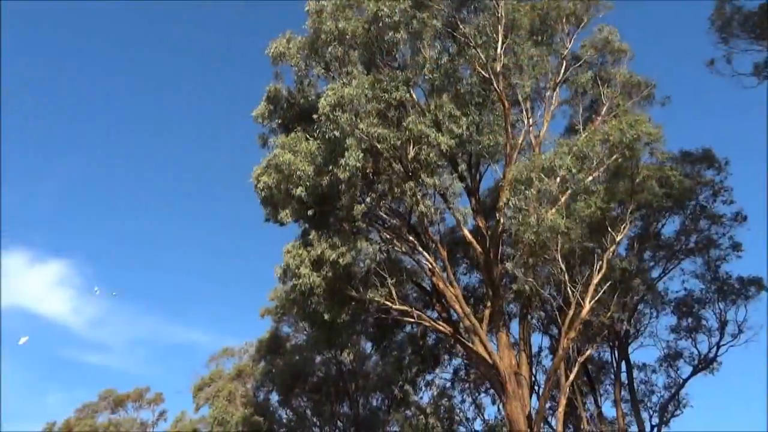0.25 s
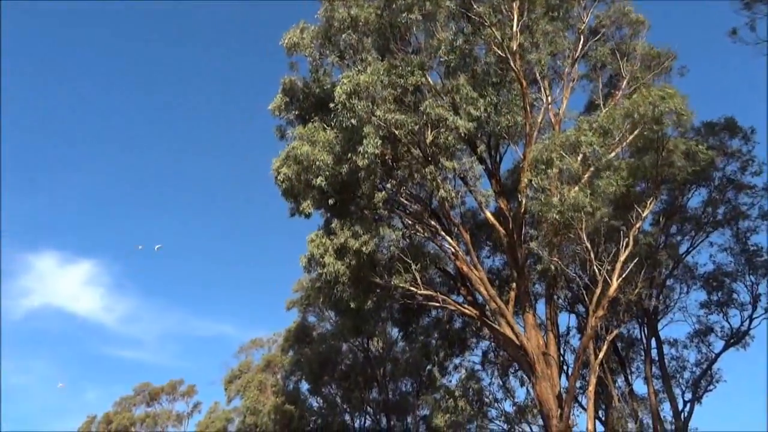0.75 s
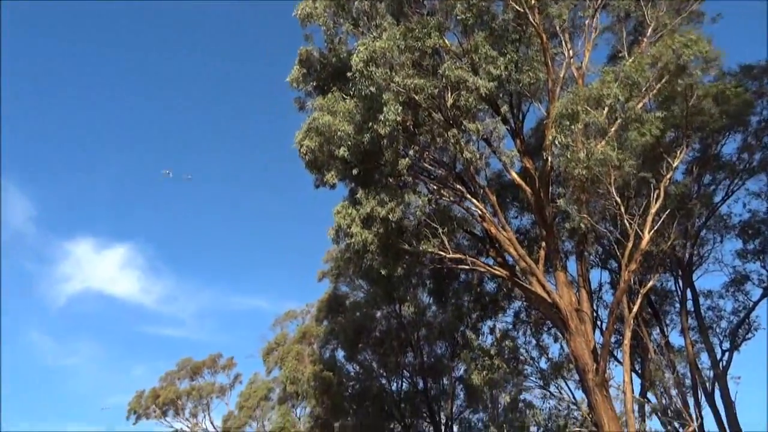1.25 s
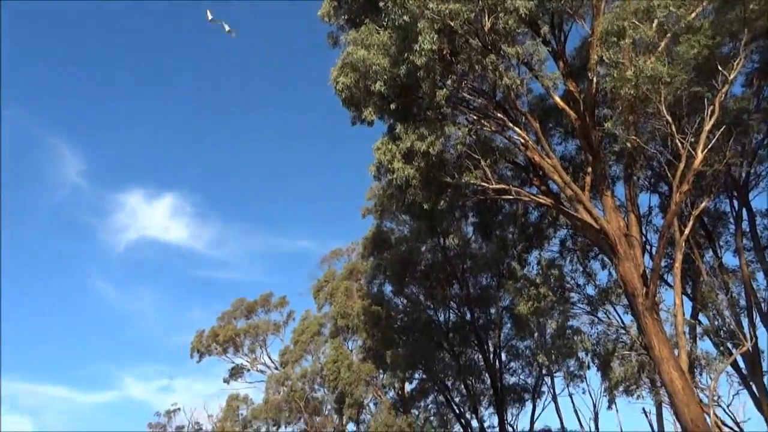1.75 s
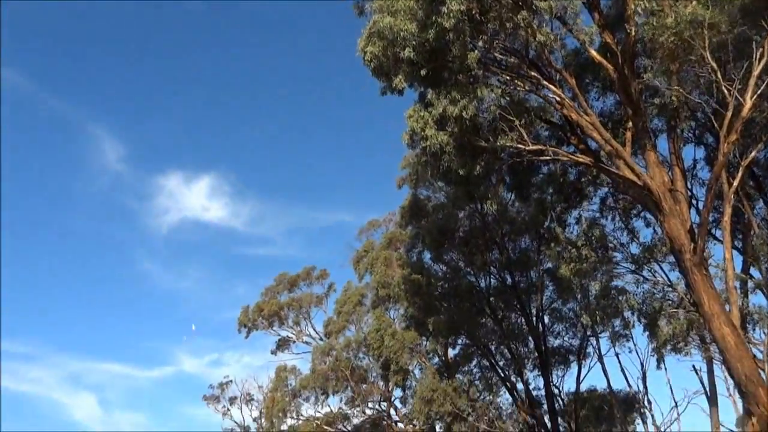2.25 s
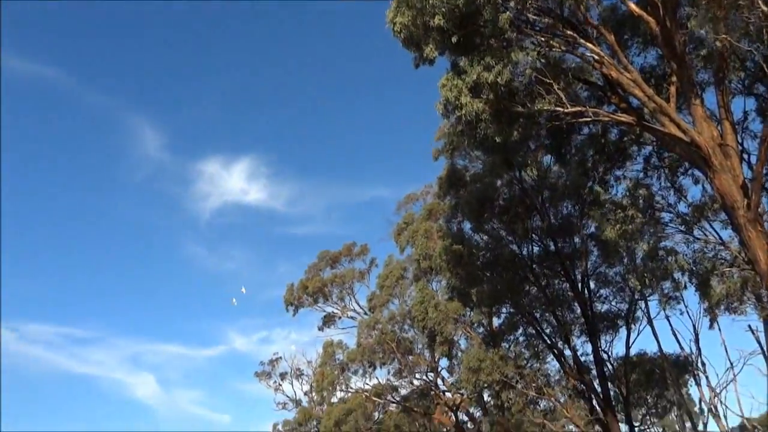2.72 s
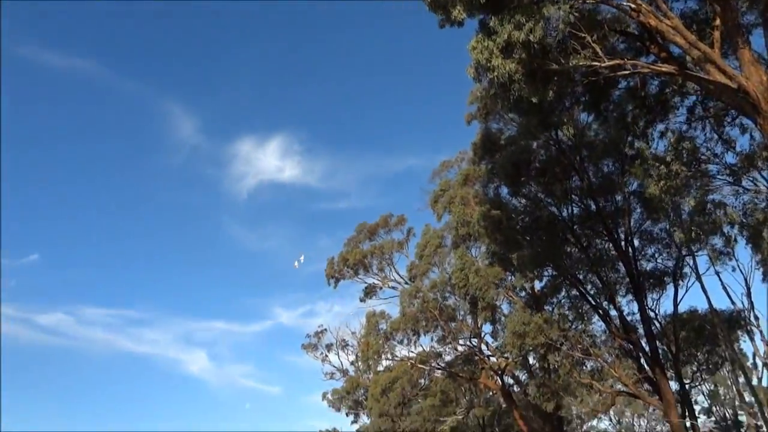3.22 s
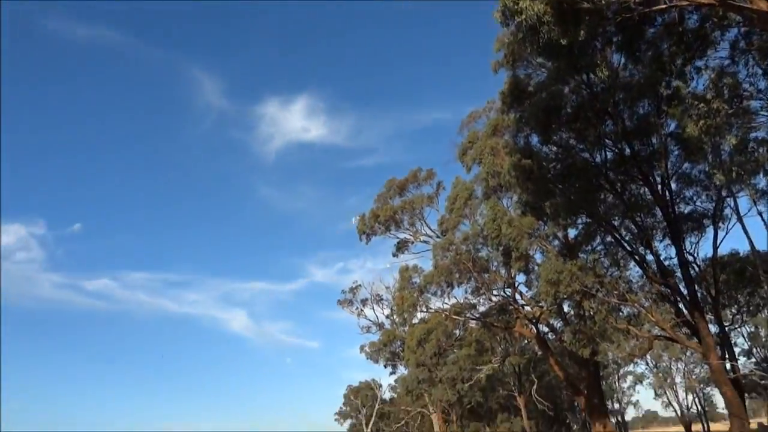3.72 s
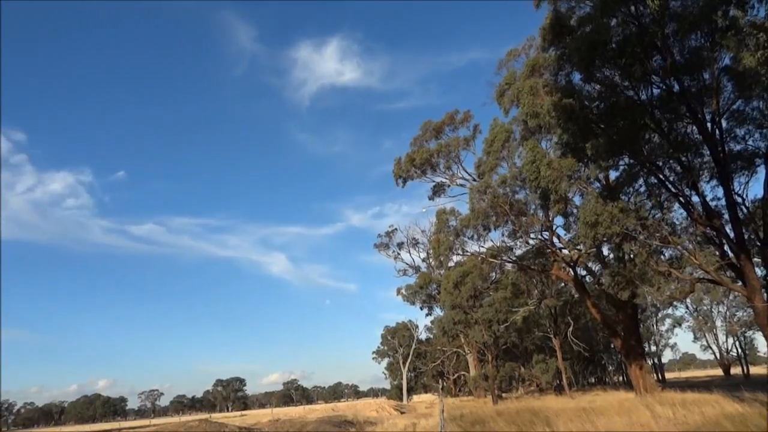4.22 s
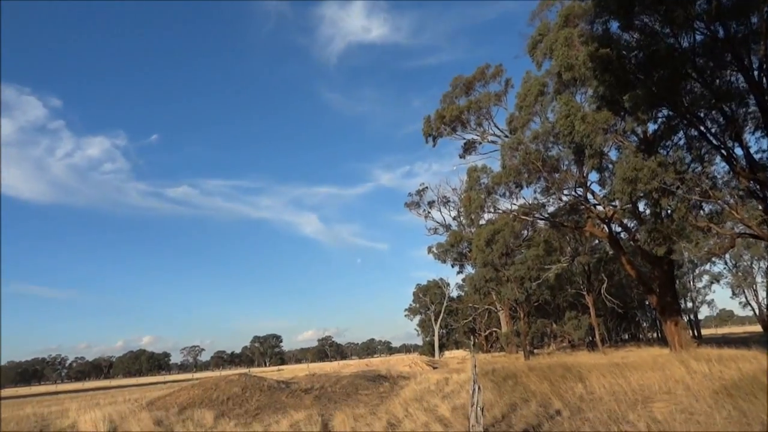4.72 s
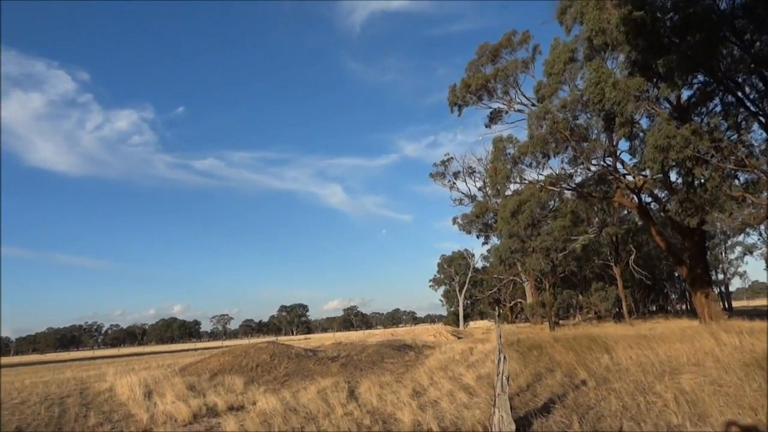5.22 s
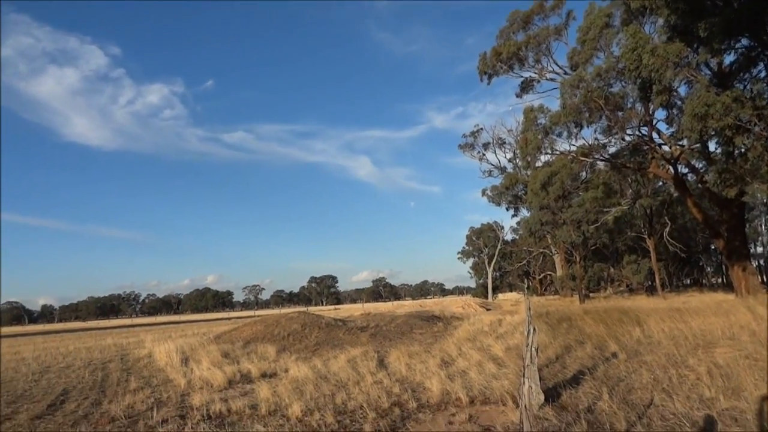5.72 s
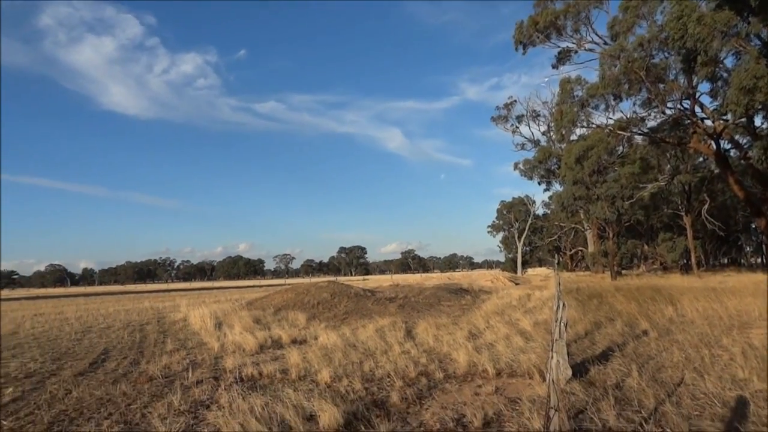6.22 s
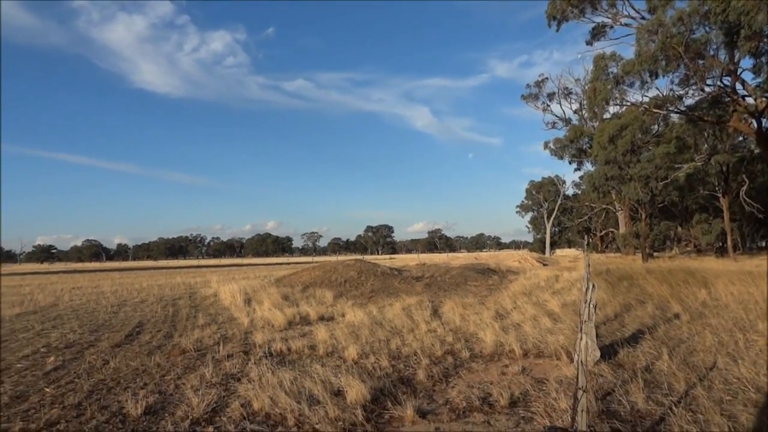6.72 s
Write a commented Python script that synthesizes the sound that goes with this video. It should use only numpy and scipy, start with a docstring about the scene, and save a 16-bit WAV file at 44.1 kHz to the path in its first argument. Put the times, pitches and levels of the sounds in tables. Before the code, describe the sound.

Wind thumps a camera microphone as near parrots give wavering, raspy yelps, with a far screeching flock and thin small-bird whistles behind.

```python
"""Open bushland in gusty wind, with a flock of cockatoos overhead.
Near birds give short wavering yelps, overtones of a bending pitch shaped by the throat, and one a long
hoarse screech of rattling noise. The far flock is a harsh chorus of broken yelps, chirps and hiss; small
birds whistle above it in thin sines, and the trees answer the near and small birds with a tail and an echo.
The wind is lumpy low noise that buffets the two ports of a camera microphone."""
import sys
import numpy as np
from scipy import signal
from scipy.fft import rfft, irfft, next_fast_len
from scipy.io import wavfile
from scipy.ndimage import uniform_filter1d, map_coordinates

SR = 44100
rng = np.random.default_rng(int(sys.argv[2]) if len(sys.argv) > 2 else 0)


def generate_wav(signal):
    """Clip the signal to [-1, 1] and save it as 16-bit WAV at the path in sys.argv[1]."""
    frames = np.transpose(np.atleast_2d(signal))
    scaled = np.clip(frames, -1, 1) * 32767
    pcm = np.round(scaled).astype(np.int16)
    wavfile.write(sys.argv[1], SR, pcm)


N = 306936  # length in samples
TOP_HZ = 15700  # band limit of the camera

# The far chorus as it swells and thins; its first row also starts the faint hiss.
# Each row: time in seconds, level of the low, middle and treble band in dB.
FAR_CHORUS = [(0.19, -31, -46, -53), (0.3, -26, -30, -38), (0.59, -26, -30.5, -40), (0.78, -22.5, -20, -27),
              (0.88, -27.5, -26.5, -36), (1.19, -17, -21, -31.5), (1.33, -20.5, -26, -36.5),
              (1.9, -23, -24, -28), (2.05, -27.5, -27, -32), (2.58, -30, -26.5, -34.5),
              (2.71, -23, -26.5, -33), (2.9, -27, -27, -33), (3.11, -29.5, -32, -42), (3.3, -29, -28, -40),
              (3.5, -32, -32.5, -38.5), (4.19, -29, -34, -49.5), (4.3, -31.5, -30, -41.5),
              (4.56, -32, -31, -49), (4.7, -37, -33.5, -43.5), (5.09, -31.5, -37.5, -52),
              (5.41, -28.5, -33.5, -52.5), (5.71, -34.5, -33.5, -47.5), (5.93, -41, -37, -52.5),
              (6.22, -31, -31, -47), (6.41, -31, -36, -51), (6.52, -26.5, -28.5, -44),
              (6.95, -29, -31.5, -44)]


def amp(db):
    """Decibels to an amplitude factor."""
    return 10 ** (np.asarray(db) / 20)


def unit(x):
    """x scaled to rms 1."""
    return x / np.sqrt(np.mean(x ** 2) + 1e-20)


def along(points, hz):
    """(Hz, value) points read off on a log frequency axis."""
    f, v = np.transpose(points)
    return np.interp(np.log(hz + 1), np.log(f + 1), v)


def curves(rows, round_s=0.0046):
    """One value per sample for each column after the time, corners rounded."""
    s, *cols = np.transpose(rows)
    t = np.arange(N) / SR
    return [uniform_filter1d(np.interp(t, s, c), int(round_s * SR) + 1) for c in cols]


def wobble(rate, size=N):
    """A smooth random curve, rate knots a second."""
    knots = rng.standard_normal(int(size * rate / SR) + 4)
    return map_coordinates(knots, [np.arange(size) * rate / SR])


def filtered(x, response):
    """x times a response of frequency."""
    m = next_fast_len(N + SR // 2)
    return irfft(rfft(x, m) * response(np.fft.rfftfreq(m, 1 / SR)), m)[..., :N]


def coloured(x, spectrum):
    """x through a (Hz, dB) spectrum, at rms 1."""
    return unit(filtered(x, lambda hz: amp(along(spectrum, hz))))


def syrinx(pitch_hz, weight, count):
    """Overtones of a moving pitch; weight(k) is the strength of overtone k."""
    turn = 2 * np.pi * np.cumsum(pitch_hz) / SR
    return sum(weight(k) * np.sin(k * turn) for k in range(1, count + 1))


def note(rows, fade_s, glide_s):
    """First sample, smooth pitch and gain of one call, with soft ends, from rows of (s, Hz, dB)."""
    s, hz, db = np.transpose(rows)
    t = np.arange(round((s[0] - fade_s) * SR), round((s[-1] + fade_s) * SR)) / SR
    ends = np.clip(np.minimum(t - t[0], t[-1] - t) / fade_s, 0, 1) ** 2
    pitch = uniform_filter1d(np.interp(t, s, hz), int(glide_s * SR))
    return round(t[0] * SR), pitch, ends * amp(np.interp(t, s, db))


def yelps():
    """Pulses through the throat; the low, pressed, loud part of a call is brighter; hoarse birds jitter and rattle."""
    # Near cockatoos. Each row: start, dip, crest and end in seconds (a crest may fall outside its call),
    # first peak, dip, crest and end pitch in Hz, first and second level in dB, hoarseness 0-1,
    # brightness in dB per overtone above the fourth.
    near_calls = [ (0.263, .304, .358, .384, 947, 704, 887, 740, -12.5, -14.5, 0.2, -3),
                  (0.429, 0.457, .479, .498, 717, 700, 730, 665, -20.5, -20.5, 0.11, 0),
                  (.5, 0.513, .548, .588, 752, 747, 781, 683, -17, -17, 0.13, -2.5),
                  (.59, 0.598, .62, .645, 735, 760, 794, 775, -22, -17, .06, -6),
                  (0.937, 0.965, .996, 1.016, 716, 729, 956, 890, -20, -19, 0.03, -8),
                  (1.005, 1.025, 1.05, 1.068, 815, 800, 812, 820, -19, -17.5, .03, -9),
                  (1.125, 1.14, 1.23, 1.212, 800, 850, 880, 730, -18, -18, .6, -2),
                  (1.2, 1.216, 1.243, 1.262, 745, 750, 828, 790, -16, -15.5, .07, -5),
                  (2.182, 2.201, 2.2, 2.25, 669, 660, 686, 675, -28, -32, .05, -13),
                  (2.471, 2.512, 2.542, 2.577, 778, 648, 805, 733, -19, -18, 0.08, -11),
                  (2.666, 2.708, 2.742, 2.756, 814, 674, 770, 738, -25, -24, 0.4, -1.5),
                  (2.787, 2.812, 2.838, 2.866, 962, 904, 1005, 950, -18, -22.5, 0.22, -2),
                  (2.937, 2.968, 3.006, 3.053, 799, 710, 828, 770, -10.5, -11, 0.09, 0.3),
                  (3.157, 3.191, 3.226, 3.247, 749, 652, 753, 740, -15.5, -15, 0.09, 0.05),
                  (3.27, 3.297, 3.3, 3.328, 825, 802, 900, 835, -12, -16.5, .06, .2),
                  (3.417, 3.444, 3.455, 3.468, 790, 785, 883, 785, -12.5, -16, .04, .3),
                  (4.3, 4.333, 4.37, 4.415, 770, 687, 813, 754, -13, -12, 0.05, 0.2),
                  (4.523, 4.563, 4.602, 4.613, 746, 627, 764, 730, -16.5, -16, 0, -1.5),
                  (5.148, 5.222, 4.7, 5.246, 775, 720, 753, 742, -30, -25, 0.33, -0.5),
                  (6.101, 6.14, 6.3, 6.191, 760, 728, 750, 750, -41, -26.5, 0.3, -1),
                  (6.226, 6.264, 6.312, 6.338, 796, 689, 805, 747, -16.5, -13, 0.06, 0.14),
                  (6.451, 6.483, 6.6, 6.556, 717, 635, 780, 781, -25, -23, .3, -1.2), ]
    # Throat resonances. Each row: frequency in Hz, overtone level in dB.
    throat = [(700, -22.5), (1500, -3), (2450, 1), (3350, -5), (4400, -12.5), (5700, -12), (7600, -21.5),
              (9800, -42), (12500, -45), (15000, -49), (16500, -58)]
    # Air hissing past the folds. Each row: frequency in Hz, relative level in dB per Hz.
    breath = [(900, -36), (1500, -5), (2800, -5), (5000, -6), (8000, -16), (10000, -25), (12000, -19),
              (15500, -30)]
    breath_db = -20.5  # under the voice
    pressed_s, relax_db = 0.019, -0.55  # after the dip the voice relaxes and loses treble, per overtone

    out = np.zeros(N)
    air = amp(breath_db) * coloured(rng.standard_normal(N), breath)
    for *shape, hoarse, bright_db in near_calls:
        start, pitch, gain = note(yelp_shape(*shape), fade_s=.008, glide_s=0.0036)
        n, hoarse = len(pitch), np.clip(hoarse, 0, 1)
        since_dip = (start + np.arange(n)) / SR - shape[1]
        relaxed = np.clip((since_dip - pressed_s) / .006, 0, 1)
        effort_db = 20 * np.log10(gain / gain.max() + .03)
        low_pitch_db = -10 * (pitch / pitch.mean() - 1)
        tilt_db = bright_db + low_pitch_db + 0.07 * effort_db + relax_db * relaxed

        def weight(k):
            """Throat, brightness and a flicker of its own for overtone k."""
            flicker_db = (2.0 + 2.8 * hoarse) * wobble(42.7, n)
            return amp(along(throat, k * pitch) + tilt_db * max(k - 4, 0) + flicker_db)

        # Overtones 2-5 set the loudness
        strength = np.sqrt(sum(amp(2 * along(throat, k * pitch)) for k in range(2, 6)) / 2)
        jitter = 1 + (0.0038 + 0.072 * hoarse) * wobble(293.0, n)
        voice = syrinx(pitch * jitter, weight, count=21) / strength
        rattle = amp(2.4 * hoarse * wobble(186, n))
        out[start:start + n] += gain * (voice + air[start:start + n]) * rattle
    return out


def yelp_shape(start, dip, crest, end, first_hz, dip_hz, crest_hz, end_hz, first_db, second_db):
    """Jump up, dip, slide to the crest, sag: rows of (s, Hz, dB)."""
    rise_s, from_below = 0.0148, .12  # jumps to its first peak from this share below it
    onset_db, dip_db, end_db = -8.5, -3.5, -3.5  # first level at the start, mean in the dip, second at the end
    recover_s = 0.0082  # from the dip to full second level
    slide_bend, sag_bend = .7, 3.1  # the slide is quick at first; the final sag comes late

    s = np.linspace(start, end, num=40)
    peak = min(start + rise_s, dip)

    def part(a, b):
        """Share of the way from a to b."""
        return np.clip((s - a) / (b - a + 1e-6), 0, 1)

    def ease(u):
        """Rounded turn at both ends."""
        return np.sin(np.pi / 2 * u) ** 2

    hz = first_hz * (1 - from_below * (1 - ease(part(start, peak))))
    hz = hz + (dip_hz - first_hz) * ease(part(peak, dip))
    hz = hz + (crest_hz - dip_hz) * ease(part(dip, crest) ** slide_bend)
    hz = hz + (end_hz - crest_hz) * part(crest, end) ** sag_bend
    turns = [start, peak, dip, min(dip + recover_s, crest), crest, end]
    levels = [first_db + onset_db, first_db, (first_db + second_db) / 2 + dip_db,
              second_db, second_db, second_db + end_db]
    return np.transpose([s, hz, np.interp(s, turns, levels)])


def screech():
    """Chaotic folds: rattling noise rings the fixed resonances of the open beak."""
    # One long hoarse screech. Each row: time in seconds, level in dB.
    swell = [(6.46, -41), (6.54, -23), (6.74, -22), (6.88, -29), (6.96, -32)]
    # Resonances of the open beak. Each row: frequency in Hz, width in Hz, level in dB.
    gape = [(2390, 290, -5), (3400, 140, -0.5), (4500, 370, -9.5), (6100, 1040, -13.5)]
    rattle = rng.standard_normal(N) * amp(2.2 * wobble(350))

    def beak(f):
        """Resonances in parallel, with alternating sign."""
        return sum((-1) ** k * amp(db) * 1j * f * w / (c * c - f * f + 1j * f * w)
                   for k, (c, w, db) in enumerate(gape))

    heard = np.arange(N) > swell[0][0] * SR
    return amp(curves(swell)[0]) * heard * unit(filtered(rattle, beak))


def whistles():
    """Small birds: thin, flickering sines with weak overtones."""
    # Straight glides. Each row: start and end in seconds, pitch from and to in Hz, level in dB.
    glides = [ (0.224, 0.258, 2550, 2940, -31), (0.35, 0.41, 4315, 4400, -33),
              (0.716, 0.73, 1806, 2130, -24), (0.722, 0.75, 2160, 1840, -24),
              (0.768, 0.79, 1890, 2050, -21), (0.463, 0.49, 4500, 4870, -25),
              (0.482, 0.52, 4320, 4380, -24.5), (0.517, 0.56, 4450, 4830, -25),
              (0.643, 0.661, 4540, 4851, -19), (0.658, 0.684, 5371, 5480, -21),
              (0.814, 0.877, 4484, 4750, -25), (1.463, 1.48, 4000, 4510, -21),
              (1.483, 1.526, 4530, 4570, -18.5), (1.505, 1.553, 4190, 4600, -20),
              (1.768, 1.781, 5340, 5140, -18), (2.02, 2.122, 5200, 5820, -36),
              (2.235, 2.265, 4230, 4320, -26.5), (2.33, 2.405, 4150, 4740, -24.5),
              (2.837, 2.862, 4400, 4800, -24.5), (2.877, 2.927, 4550, 5740, -27),
              (3.945, 3.988, 2760, 3150, -34), (4.004, 4.034, 5270, 5600, -25.5),
              (4.08, 4.083, 5330, 5400, -30), (4.015, 4.045, 4550, 4650, -33),
              (4.115, 4.135, 5400, 5450, -37), (3.955, 3.98, 5250, 5400, -31),
              (4.46, 4.48, 5300, 4700, -32), (4.818, 4.872, 4040, 4524, -36),
              (4.872, 4.898, 4524, 4300, -29), (4.982, 5.017, 4400, 4500, -32),
              (5.02, 5.074, 4550, 4800, -34), (5.24, 5.26, 3600, 3970, -31),
              (5.55, 5.588, 2600, 2980, -30.5), (5.702, 5.758, 4450, 4910, -33),
              (5.73, 5.773, 2600, 3050, -40), (6.009, 6.072, 4460, 4762, -30.5),
              (6.16, 6.188, 5230, 5130, -36), ]
    # One bird's wavering phrase. Each row: time in seconds, pitch in Hz, level in dB.
    warble = [(5.508, 4770, -43), (5.53, 5280, -30), (5.561, 4270, -30), (5.585, 4880, -27),
              (5.605, 4270, -31), (5.635, 5500, -32), (5.652, 4800, -39), (5.662, 5220, -38),
              (5.69, 5850, -30), (5.735, 5750, -31), (5.755, 4500, -33), (5.785, 3450, -38)]
    out = np.zeros(N)
    for rows in [glide(*row) for row in glides] + [warble]:
        start, pitch, gain = note(rows, fade_s=0.012, glide_s=0.0035)
        n = len(pitch)
        unsteady = pitch * (1 + 0.0038 * wobble(123, n))
        voice = syrinx(unsteady, lambda k: amp(-19 * (k - 1)) * (k * pitch < TOP_HZ), count=3)
        flicker = amp(2.0 + 3.7 * wobble(59.6, n))
        out[start:start + n] += gain * flicker * voice
    return out


def glide(start, end, from_hz, to_hz, db):
    """A straight glide that swells and fades: rows of (s, Hz, dB)."""
    top = 0.77  # share of the glide at which it is loudest
    return [(start, from_hz, db - 3),
            (start + top * (end - start), from_hz + top * (to_hz - from_hz), db),
            (end, to_hz, db - 1.5)]


def flock():
    """Many far birds: broken yelps and quick chirps inside the hiss of hoarse screeches."""
    # Low, middle and treble band of the chorus. Each row: frequency in Hz, relative level in dB per Hz.
    squawk = [(700, -53), (1100, -4), (1500, 3), (1900, 1), (2400, 2), (3300, 0.5), (3900, -30.5),
              (5000, -62)]
    chatter = [(2800, -54), (3600, 1), (4500, 2), (5000, -1.5), (5600, 1.5), (6200, -7.5), (7000, -65)]
    rasp = [(5500, -38), (6500, 5.5), (8300, 4), (9600, -9.5), (11300, -2.5), (13700, -15), (15500, -35)]
    squawk_db, chatter_db, rasp_db = curves(FAR_CHORUS)
    heard = np.arange(N) > FAR_CHORUS[0][0] * SR
    voices = chirps = 0
    for bird in range(4):
        yelp_hz = 770 * np.exp(.1 * wobble(18) + 0.01526 * wobble(250))
        yelp = syrinx(yelp_hz, lambda k: amp(3.9 * wobble(18)), count=7)
        voices = voices + yelp * amp(7.0 * np.tanh(0.6 * wobble(24)))
        chirp_hz = 4700 * np.exp(.1 * wobble(22) + 0.0055 * wobble(120))
        chirp = syrinx(chirp_hz, lambda k: 1, count=3)
        chirps = chirps + chirp * amp(12 * np.tanh(1.6 * wobble(38)))

    # Noise made patchy in both pitch and time
    z = signal.stft(rng.standard_normal(N), nperseg=256)[2]
    patches = uniform_filter1d(uniform_filter1d(rng.standard_normal(z.shape), 3, 0), 14, 1)
    hiss = signal.istft(z * amp(3.77 * unit(patches)), nperseg=256)[1][:N]

    din = hiss + amp(-8) * unit(voices) + amp(-7) * unit(chirps)
    throb = amp(0.26 * wobble(8.3) + 1.23 * wobble(300))  # voices swell; vocal folds rattle
    bands = amp(squawk_db) * coloured(din, squawk)
    bands = bands + amp(chatter_db) * coloured(din, chatter)
    bands = bands + amp(rasp_db) * coloured(din, rasp)
    return heard * throb * bands


def trees(x):
    """A diffuse, different tail for each ear, and one echo off the tree line."""
    t = np.arange(SR // 2) / SR
    tail = rng.standard_normal((2, len(t))) * amp(-60 * t / .5)  # falls 60 dB in half a second
    wet = signal.fftconvolve(x[None], tail / np.linalg.norm(tail[0]), axes=1)[:, :N]
    echo = np.pad(x, (int(.075 * SR), 0))[:N]
    return amp(-13) * wet.mean(0) + amp(-20) * wet + amp(-24.5) * echo


def wind():
    """Eddies thump on the ports, most alike in the bass; the stronger the puff, the sharper its edge."""
    # Rise and fall of the buffeting. Each row: time in seconds, level in dB.
    buffeting = [(0, -32), (0.16, -40), (0.26, -17), (0.75, -20), (1.6, -22), (1.75, -18), (2.12, -23.5),
                 (2.2, -16), (2.63, -11.5), (2.84, -14), (3.0, -19.5), (3.45, -14.5), (3.71, -16.5),
                 (3.9, -12), (4.18, -12), (4.56, -21.5), (4.72, -22), (4.9, -18.5), (5.3, -15),
                 (5.58, -15.5), (5.81, -23.5), (6.24, -14), (6.39, -20), (6.75, -20), (6.96, -12.5)]
    # Single thumps on top. Each row: time in seconds, peak in dB, added to the buffeting amplitude.
    single_thumps = [(0.0, -12), (0.085, -25), (0.115, -21), (0.205, -15), (0.45, -25), (0.654, -32),
                     (0.874, -17.5), (0.993, -18), (1.18, -20), (1.322, -18.5), (1.432, -14.5),
                     (1.541, -20), (1.646, -25), (1.965, -14), (2.052, -17.5), (3.06, -18.5),
                     (3.183, -18.5), (4.653, -22.5), (4.88, -21), (6.462, -13.5), (6.622, -15.5),
                     (6.825, -17)]
    thump_s = 0.022  # half width of a thump
    # Head-on puffs. Each row: time in seconds, relative peak in dB.
    gusts = [(0.003, -10), (0.018, -5), (0.056, -17.5), (0.094, -9.5), (0.113, -13.5), (0.152, -18.5),
             (0.18, -14), (0.204, -18)]
    # Slow rolling under the buffeting. Each row: time in seconds, level in dB relative to the buffeting.
    deep = [(0, -17), (.3, -8), (1, -4), (2, -6.5), (3, -19), (4, -37), (5.5, -17), (6.96, -28)]
    # Colours of buffet, roll and the sharp edge of strong puffs.
    # Each row: frequency in Hz, relative level in dB per Hz.
    buffet_colour = [(12, -60), (20, -42.5), (140, -5.5), (192, -2), (308, -2.5), (409, -5), (962, -20),
                     (1100, -26.5), (1430, -25), (2420, -120)]
    roll_colour = [(15, -31), (30, -21), (60, -3), (110, 2.5), (180, 6), (400, -46)]
    slap_colour = [(150, -40), (500, 4), (1000, -6.5), (2500, -19), (7000, -44.5), (12000, -92)]
    # Likeness of the two ports. Each row: frequency in Hz, left-right likeness 0-1.
    alike = [(40, 0.69), (130, 0.84), (290, 0.68), (1000, 0.32)]
    # The wind sweeps from left to right port. Each row: frequency in Hz, phase lead in radians.
    sweep = [(60, .05), (260, 0.83), (600, 1.82), (1000, 2.15)]

    t = np.arange(N) / SR
    thumps = sum(amp(peak_db) * np.exp(-.5 * ((t - s) / thump_s) ** 2) for s, peak_db in single_thumps)
    db = 20 * np.log10(amp(curves(buffeting)[0]) + thumps)

    def ports(hz):
        """Mix of two noises into each port, for the wanted likeness and lead."""
        turn = np.arccos(np.clip(along(alike, hz), -1, 1)) / 2
        lead = np.exp(.5j * along(sweep, hz))
        shared, apart = np.cos(turn), np.sin(turn)
        return np.array([[shared * lead, apart * lead], [shared / lead, -apart / lead]])

    def pair(lumps, spectrum):
        """Lumpy noise at both ports, coloured, at rms 1."""
        noise = lumps * rng.standard_normal((2, N))
        return unit(filtered(noise, lambda hz: amp(along(spectrum, hz)) * ports(hz)).sum(1))

    puffs = np.tanh(0.77 * wobble(45))
    thump = pair(amp(3.77 * puffs), buffet_colour) + amp(curves(deep)[0]) * pair(1, roll_colour)
    slap = pair(amp(4.8 * puffs + 13.0 * np.tanh(0.85 * wobble(180))), slap_colour)
    slap_db = -12.0 + 0.61 * (db + 16.5)  # grows with the wind
    # Quick onset, then a fall of 60 dB in 66 ms
    head_on = sum(amp(peak_db - 60 * np.abs(t - s) / 0.066) * np.clip((t - s) / 0.0024, 0, 1) ** 2
                  for s, peak_db in gusts)
    return amp(db) * (thump + amp(slap_db) * slap) + amp(5.0) * head_on * pair(1, slap_colour)


def scene():
    """Near birds in the centre, flock and small birds to the right, trees and wind around them."""
    # Lean to the right. Each row: frequency in Hz, left minus right in dB.
    lean = [(1000, -2), (2400, -1), (4400, -3.5), (8000, -2.5), (14000, -1.5)]
    near, small = yelps() + screech(), whistles()
    right = filtered(small + flock(), lambda hz: amp(along(lean, hz) * [[.5], [-.5]]))
    return near + right + trees(near + small) + wind()


def record(dry):
    """Faint hiss joins in, the loudest peaks clip softly; nothing above the camera's band limit is kept."""
    heard = np.arange(N) > FAR_CHORUS[0][0] * SR
    hiss = coloured(rng.standard_normal(N), [(1000, -13), (6000, 2), (15000, -13)])
    dry = dry + amp(-46) * hiss * heard
    soft = dry / (1 + np.abs(dry / 1.02) ** 8) ** (1 / 8)
    return filtered(soft, lambda hz: hz < TOP_HZ)


dry = scene()
out = record(dry)
generate_wav(out)
```